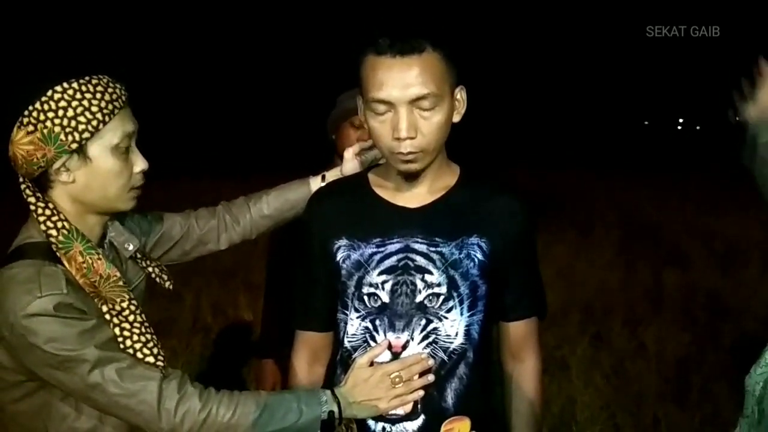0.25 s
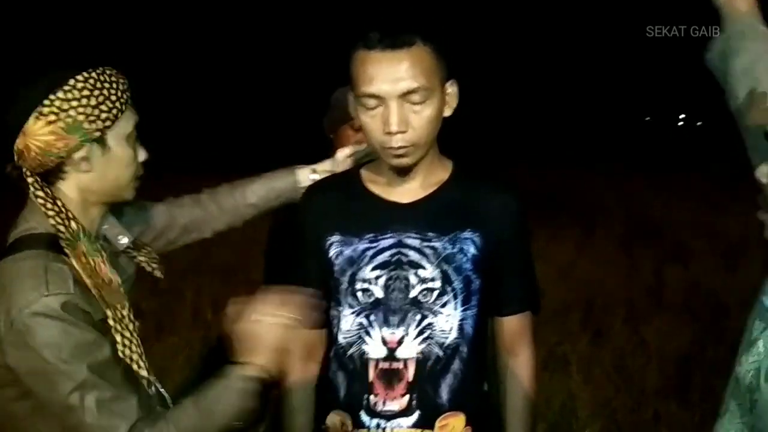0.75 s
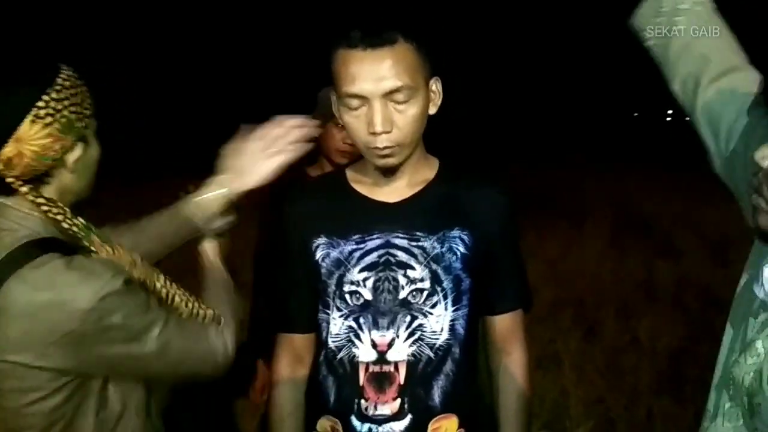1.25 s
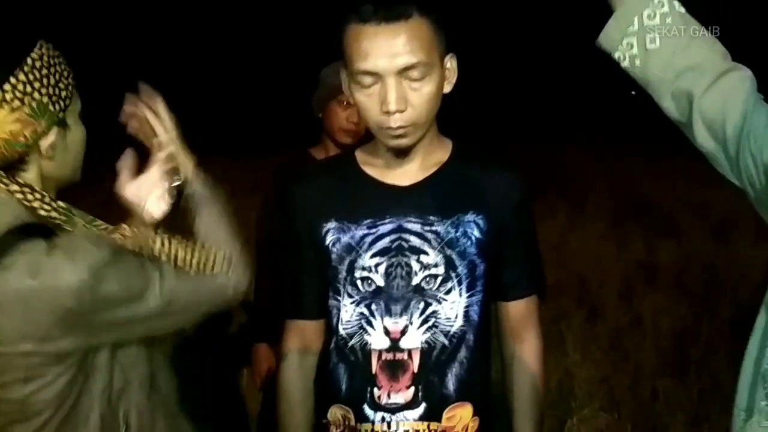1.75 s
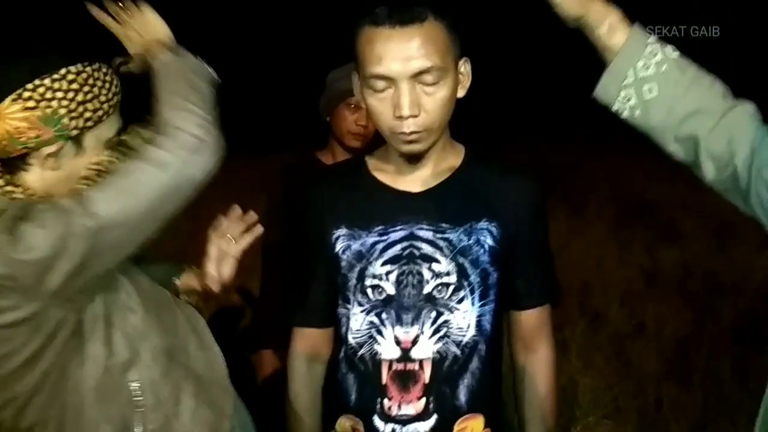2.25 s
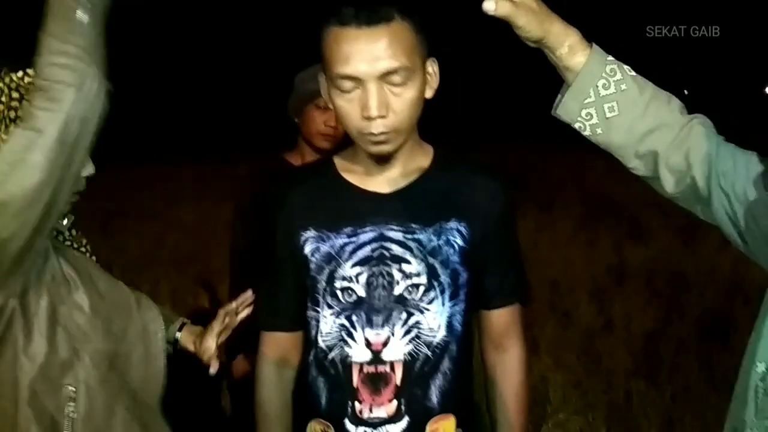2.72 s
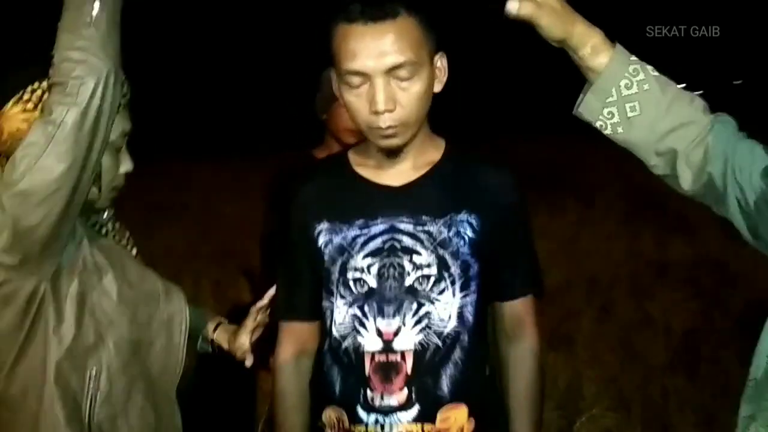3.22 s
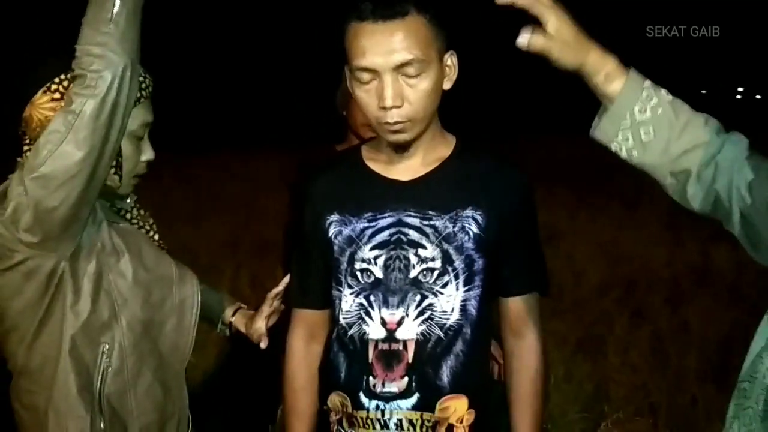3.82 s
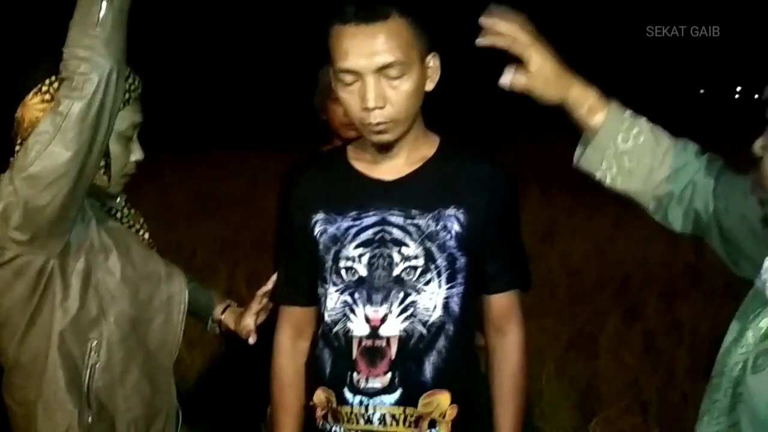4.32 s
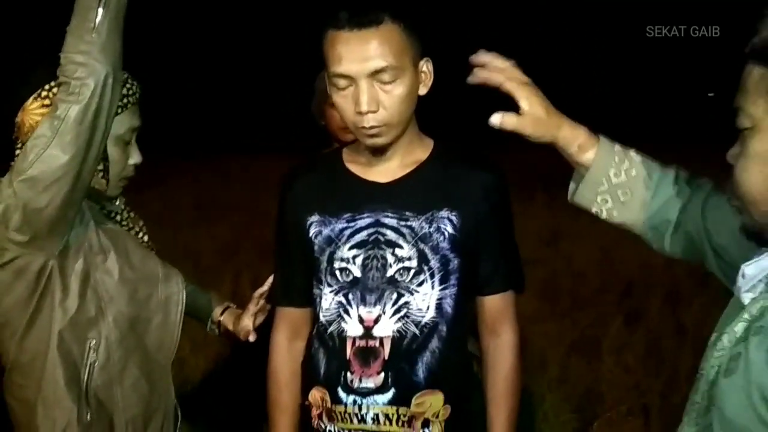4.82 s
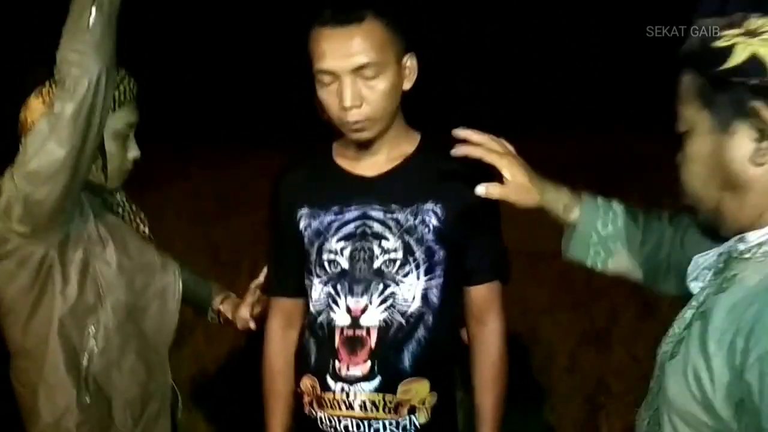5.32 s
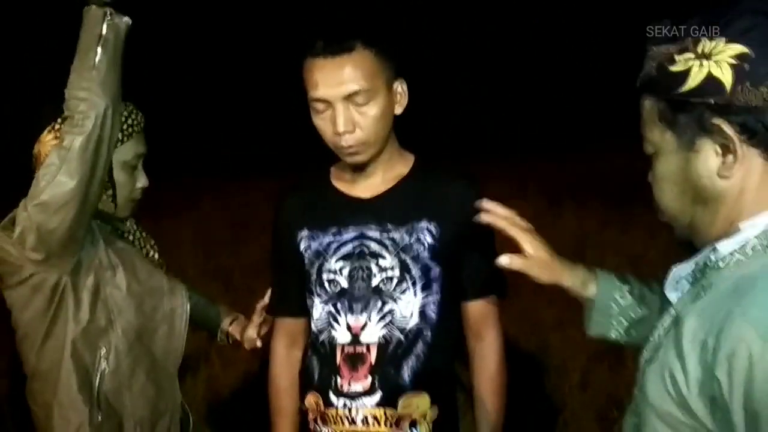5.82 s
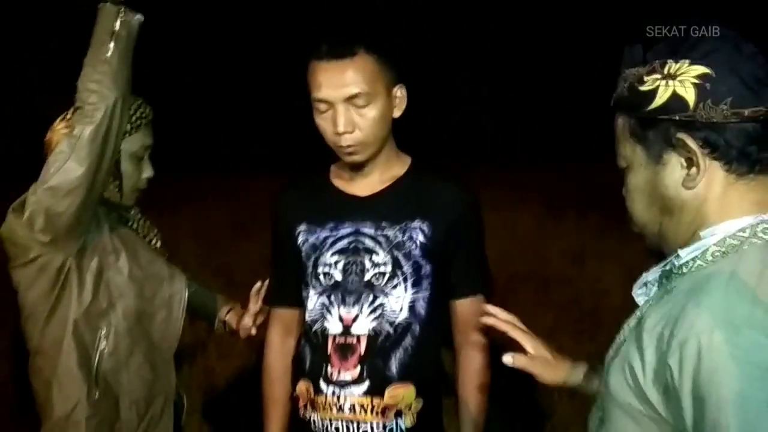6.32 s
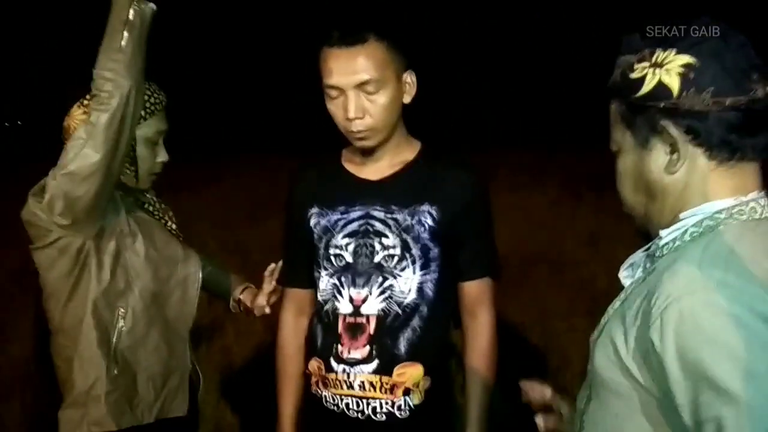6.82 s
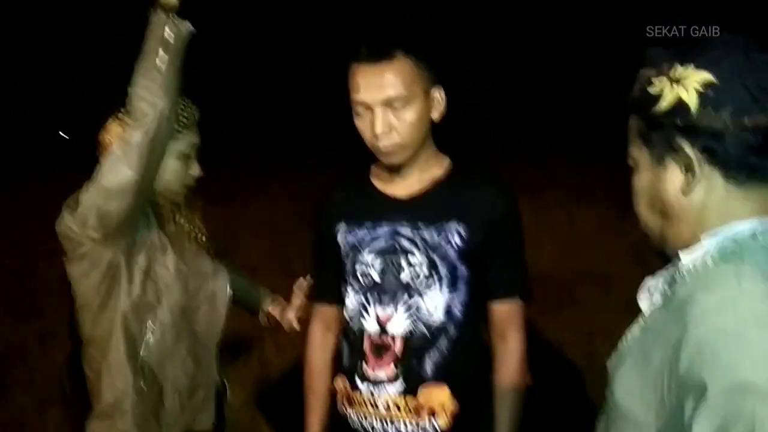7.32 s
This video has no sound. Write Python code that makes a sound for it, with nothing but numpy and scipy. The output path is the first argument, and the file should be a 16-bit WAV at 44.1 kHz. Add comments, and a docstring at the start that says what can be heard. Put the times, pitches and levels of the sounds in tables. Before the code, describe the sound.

A dark open field at night, heard in stereo without room echo. From 0 s to 7.5 s a near katydid left of centre rasps about four times a second: a double wing tick, then usually three grainy strokes within a tenth of a second, brightest near 8 kHz. Behind it lie a shimmering hiss of far insects, stronger on the right, faint throbbing crickets, a steady very high buzz on the right and low distant traffic. Clothes rustle nearby from about 0.7 s; a sleeve swishes or foot scuffs at 1.4 and 1.9 s. A grip creaks in a short run of dull knocks at 1.9 s and briefly higher at 2.5 s. A far engine drone swells around 2.8 s and recedes. At 3.6 s a second, softer katydid joins near the centre, strengthening until 5.4 s. Cloth rustles again at 5.2 and 5.8 s; low crickets rise near the end, with a tiny scuff at 7.46 s.

```python
"""Night in an open field, over distant traffic, far crickets and a steady high buzz on the right.
From the start a near katydid on the left rasps four chirps a second: a double wing tick, then two or three
strokes of the file. Someone close by rustles their clothes and scuffs a foot; at 1.9 and 2.5 s a grip creaks.
A far engine swells around 2.8 s, a second katydid joins at 3.6 s, and the low crickets rise near the end.
Strokes are noise gated by slips of the scraper; resonances and filtered noise make the rest."""
import sys
import numpy as np
from scipy import signal
from scipy.fft import rfft, irfft, next_fast_len
from scipy.io import wavfile
from scipy.ndimage import uniform_filter1d, map_coordinates

SR = 44100
rng = np.random.default_rng(int(sys.argv[2]) if len(sys.argv) > 2 else 0)


def master_out(mix):
    """Clip the mix to full scale and print it as 16-bit PCM to the path in sys.argv[1]."""
    frames = np.transpose(np.atleast_2d(mix))
    ceiling = np.clip(frames, -1, 1)
    pcm = np.round(ceiling * 32767).astype(np.int16)
    wavfile.write(sys.argv[1], SR, pcm)


N = 332955
T = np.arange(N) / SR  # time in s

# distant traffic, spectrum: freq_hz, relative_db
RUMBLE_SPECTRUM = [(20, -21), (35, -18), (50, -5), (70, -7.5), (105, -3.5), (135, 2), (185, 0), (240, -7.5),
                   (330, -14), (500, -22.5), (800, -27.5), (1300, -55.5), (2000, -82), (4000, -80),
                   (10000, -39)]
# side against mid in the rumble and cloth noise: freq_hz, side_db
STEREO_WIDTH = [(60, -12), (130, -14.5), (260, -9.5), (500, -5.5), (1000, 1)]
# a far engine draws near and recedes: time_s, relative_db
ENGINE_PASS = [(0, -42), (1.5, -42.5), (2.8, -38.5), (4.6, -40), (6, -42), (7.55, -48)]
# song of tyres on the road: time_s, level_db
TYRE_SONG = [(0.6, -63), (1.2, -57), (2, -60), (4.1, -56.5), (4.8, -66)]

# far cricket choruses: centre_hz, width_hz, pulse_rate_hz, relative_db, swell_share (0 to 1)
CRICKET_CHORUSES = [(2413, 460, 18, -56, 0.7), (4702, 864, 27, -50.5, 0.1), (5954, 690, 15, -50, 0.07)]
# swelling shared by the choruses, mostly heard in the lowest: time_s, swell_db
CHORUS_SWELL = [(0, -2), (1.7, 2.5), (4, 1), (5.5, 1.5), (6.5, 2.5), (7.5, 7.5)]
# blended hiss of far katydids, left spectrum: freq_hz, relative_db
HISS_LEFT_SPECTRUM = [(3800, -42), (5400, -49), (6400, 12), (7300, 16), (8100, 8), (8900, 2), (9700, 21),
                      (10700, -5), (13500, 15), (14100, -5), (15500, -28)]
# blended hiss of far katydids, right spectrum: freq_hz, relative_db
HISS_RIGHT_SPECTRUM = [(3800, -67), (5400, -51), (6400, 0.5), (7200, 4), (8100, 10.5), (8800, -0.5),
                       (9700, 8.5), (11300, 6.5), (13500, 1), (14100, -12), (15500, -6)]

# moving clothes: time_s, relative_db
CLOTH_MOVES = [(0.06, -77), (0.63, -68), (0.73, -53), (1.03, -59.5), (1.2, -54), (1.92, -46.5),
               (2.17, -50.5), (3.39, -51), (5.05, -64), (5.24, -49), (5.38, -66), (5.58, -57),
               (5.77, -48.5), (5.97, -52.5), (6.45, -60.5), (7.4, -63)]
# colour of the cloth noise: freq_hz, relative_db
CLOTH_SPECTRUM = [(150, 4), (350, 7.5), (700, 12.5), (1000, 8.5), (1250, 8.5), (1550, 9), (1950, -6),
                  (3200, -5), (4000, -18), (5000, -30), (9000, 10), (15000, 1)]
# a sleeve's swish and foot scuffs: start_s, length_s, centre_hz, width_hz, level_db
SCUFF_EVENTS = [(0.22, 0.12, 600, 500, -53), (1.42, 0.36, 930, 1460, -46), (1.872, 0.12, 404, 402, -42),
                (7.46, 0.023, 890, 400, -48)]
# creaks of a grip: start_s, slip_count, ring_hz, slip_level_db
CREAK_EVENTS = [(1.890, 10, 350, -29), (2.4928, 2, 570, -27.5)]
SLIP_PERIOD_S, SLIP_SCATTER_DB = .006, 1.5

# resonances of the second katydid's wings: centre_hz, width_hz, relative_db
ANSWER_WING_MODES = [(7290, 84, -0.5), (8330, 180, -7.5), (9650, 430, -7.5), (11970, 480, -10.5),
                     (14500, 970, -11.5)]
# the second katydid keeps its own even beat, and warms up to full strength
ANSWER_START_S, ANSWER_PERIOD_S, ANSWER_STROKE_S = 3.604, .2305, .025
ANSWER_DB, ANSWER_SOFT_DB, WARM_UP_S = -35, -5, 1.8

# near katydid's chirps; after two strokes the next comes sooner: tick_s, stroke_count, relative_db
NEAR_CHIRPS = [(0.0288, 3, -28.5), (0.2732, 3, -28.5), (0.5007, 3, -29), (0.7356, 3, -29),
               (0.9667, 3, -28.5), (1.2007, 3, -27.5), (1.4307, 3, -28), (1.6586, 3, -27.5),
               (1.8899, 3, -29), (2.1265, 3, -28), (2.3608, 3, -28.5), (2.5916, 3, -28.5),
               (2.8209, 3, -28.5), (3.0565, 3, -27), (3.2871, 3, -28.5), (3.5072, 3, -29.5),
               (3.7383, 3, -28), (3.9695, 3, -29), (4.1945, 3, -29.5), (4.4196, 3, -29), (4.6508, 3, -29),
               (4.8866, 2, -30.5), (5.0848, 2, -30.5), (5.2843, 3, -29.5), (5.5188, 3, -29),
               (5.754, 3, -29.5), (5.9793, 3, -28.5), (6.2071, 3, -29), (6.4394, 3, -28), (6.6752, 2, -28),
               (6.8815, 3, -28), (7.1102, 3, -27), (7.3416, 3, -28)]
# strokes of a chirp, the second the sharpest: delay_after_tick_s, attack_s, rasp_between_slips_db
CHIRP_STROKES = [(.0130, .006, -3), (.0372, .0035, -8), (.0615, .006, -5)]
# what the near katydid's wings radiate: freq_hz, relative_db
WING_SPECTRUM = [(1800, -45.5), (2450, -20), (2800, -33.5), (3150, -25.5), (3900, -32.5), (4700, -22.5),
                 (5350, -27), (5900, -18.5), (6700, -9), (7600, 0), (8150, 0.5), (8900, -7.5), (10200, -6),
                 (12000, -13.5), (14200, -10)]
# sharp resonances of its wings: centre_hz, width_hz, relative_db
NEAR_WING_MODES = [(7680, 35, 4.5), (7860, 38, -13.5), (7980, 48, -10)]
PEAK_HZ, PEAK_WIDTH_HZ = 7970, 800  # its main, broad wing resonance
# its slowly changing bearing: time_s, left_minus_right_db, main_resonance_db
NEAR_BEARING = [(0, 4.5, -2), (3, 4.5, -2), (5.1, 4.5, 3.5), (7.4, 4, -1)]
# how much later it reaches the right ear: time_s, delay_s
RIGHT_EAR_LAG = [(0, .000428), (3.2, .000423), (3.9, .000413), (4.9, .000412), (5.8, .000403),
                 (7.4, .000396)]
# colour of its sound on the right, the side facing away: freq_hz, relative_db
FAR_SIDE_SPECTRUM = [(5000, -1), (6000, 1), (6600, -1.5), (7700, -8), (8400, -3), (9200, 0), (12000, -1),
                     (13300, -7), (14300, -10)]

TOP_HZ = 15450  # top of the audible band


def undb(db):
    """Decibels to gain."""
    return 10 ** (np.asarray(db) / 20)


def unit(x):
    """Scale to rms 1."""
    return x / np.sqrt(np.mean(x ** 2))


def curve(points):
    """Join (time, value) points with straight lines over the whole scene."""
    return np.interp(T, *np.transpose(points))


def pan_gain(pan_db):
    """Left and right gains that differ by pan_db; positive leans left."""
    return undb(np.array([[pan_db], [-pan_db]]) / 2)


def filtered(x, response):
    """Filter by a response given as a function of frequency."""
    size = next_fast_len(N + 8192)
    hz = np.maximum(np.arange(size // 2 + 1) * SR / size, 1)
    return irfft(rfft(x, size) * response(hz), size)[..., :N]


def colour(x, points):
    """Filter by (Hz, dB) points joined on a log-frequency axis."""
    hz, db = np.transpose(points)
    return filtered(x, lambda f: undb(np.interp(np.log(f), np.log(hz), db)))


def resonate(x, modes):
    """Ring a sound through parallel resonances, each with its own centre, width and level."""
    return filtered(x, lambda f: sum(undb(db) / (1 + 2j * (f - hz) / width) for hz, width, db in modes))


def band_noise(hz, width, order):
    """Two unrelated channels of noise in one band, rms 1."""
    noise = rng.standard_normal((2, N))
    return unit(filtered(noise, lambda f: 1 / np.sqrt(1 + np.abs(2 * (f - hz) / width) ** (2 * order))))


def wide_noise(points):
    """Coloured mid and side noise, rms 1; the side is held down most in the bass."""
    mid, side = colour(rng.standard_normal((2, N)), points)
    return unit(mid + colour(side, STEREO_WIDTH) * np.array([[1], [-1]]))


def walk(rate):
    """Slow chance: random levels, rate a second, joined smoothly with a spread near 1."""
    hold = max(int(SR / rate), 1)
    levels = np.repeat(rng.standard_normal(N // hold + 1), hold)
    return 1.207 * uniform_filter1d(levels, hold)[:N]


def shimmer(x, depth_db, rate, size=256):
    """Let neighbouring bands swell and fade on their own, about rate times a second."""
    bands = signal.stft(x, nperseg=size)[2]
    hold = max(int(2 * SR / size / rate), 1)
    drift = uniform_filter1d(rng.standard_normal(bands.shape[-2:]), hold, axis=1)
    drift = unit(uniform_filter1d(drift, size=3, axis=0))
    return signal.istft(bands * undb(depth_db * drift), nperseg=size)[1][..., :N]


def add(track, s, piece):
    """Mix a piece into a track from time s on."""
    i = int(np.clip(s * SR, 0, N))
    track[..., i:i + piece.shape[-1]] += piece[..., :N - i]


def scatter(x, t60):
    """Grass and bodies scatter a sound into a short tail, unrelated left and right."""
    t = T[:SR // 5]
    tail = rng.standard_normal((2, len(t))) * undb(-60 * t / t60)
    return signal.fftconvolve(x[None], tail / np.sqrt(np.sum(tail ** 2) / 2), axes=1)[:, :N]


def blur(x, t60):
    """Leaves and grass smear each click into a short noise tail, different every time and at each ear."""
    fade = undb(-60 * T[:SR // 5] / t60) ** 2
    power = signal.fftconvolve(x ** 2, fade / fade.sum())[:N]
    return np.sqrt(np.maximum(power, 0)) * rng.standard_normal((2, N))


def traffic(rumble_db=-37.0, drone_hz=105, drone_db=-6, exhaust_db=-5, surge_db=0.3):
    """A steady rumble, and a far engine whose exhaust noise and wavering drone swell together."""
    rumble = wide_noise(RUMBLE_SPECTRUM) * undb(rumble_db)
    drone = np.sin(2 * np.pi * np.cumsum(drone_hz * (1 + .012 * walk(6))) / SR)
    exhaust = band_noise(96.7, 41, order=3)[0]
    engine = undb(drone_db) * drone + undb(exhaust_db) * exhaust
    return rumble + engine * undb(curve(ENGINE_PASS) + surge_db * walk(4.2))


def tyres(hz=1000, width_hz=130):
    """Tyres sing faintly on the distant road, a narrow band of noise."""
    return band_noise(hz, width_hz, order=2) * undb(curve(TYRE_SONG))


def far_insects(throb_db=1.5, swell_db=1, flicker_db=1.5, patchy_db=2.5, shimmer_db=3.0,
                left_db=-41, right_db=-36.0):
    """Cricket choruses throb at loose pulse rates; the farthest singers blend into a shimmering hiss."""
    choruses = 0
    for hz, width, rate, db, share in CRICKET_CHORUSES:
        phase = 2 * np.pi * np.cumsum(rate * (1 + 0.26 * walk(8.3))) / SR
        slow_db = share * curve(CHORUS_SWELL) + swell_db * walk(4.02)
        singers = shimmer(band_noise(hz, width, order=10), patchy_db, rate=25)
        choruses = choruses + singers * undb(db + slow_db + throb_db * np.sin(phase))
    hiss = []
    for db, points in [(left_db, HISS_LEFT_SPECTRUM), (right_db, HISS_RIGHT_SPECTRUM)]:
        noise = shimmer(rng.standard_normal(N), shimmer_db, rate=20)
        hiss.append(undb(db + flicker_db * walk(60)) * unit(colour(noise, points)))
    return choruses + np.array(hiss)


def buzzer(level_db=-46, pan_db=-3, beat_hz=220.2):
    """A distant bush cricket on the right buzzes without pause, one click per wing beat, high in the treble."""
    beats = np.floor(np.cumsum(beat_hz * (1 + .0013 * walk(25))) / SR)
    clicks = np.diff(beats, prepend=0)
    song = colour(clicks, [(8000, -30), (11200, -4), (12900, 0), (13700, -1), (14500, -12)])
    return undb(level_db) * pan_gain(pan_db) * unit(scatter(song, t60=0.055))


def person(cloth_db=7.0, crinkle_db=2.25):
    """Clothes rustle with the arms, a sleeve swishes and feet scuff the soil: shaped bursts of noise."""
    out = wide_noise(CLOTH_SPECTRUM) * undb(curve(CLOTH_MOVES) + cloth_db + crinkle_db * walk(45))
    for s, length, hz, width, db in SCUFF_EVENTS:
        push = np.hanning(int(length * SR))
        mid, side = band_noise(hz, width, order=2)[:, :len(push)]
        add(out, s, undb(db) * push * unit(mid + 0.49 * side * np.array([[1], [-1]])))
    return out


def creaks(width_hz=650):
    """Something held tight sticks and slips, each slip a dull knock; a harder grip rings higher."""
    out = 0
    for s, count, hz, db in CREAK_EVENTS:
        slips = np.zeros(N)
        for k in range(round(count)):
            add(slips, s + k * SLIP_PERIOD_S, undb(db + SLIP_SCATTER_DB * rng.standard_normal(1)))

        def body(f):
            """One damped resonance, dulled above twice its pitch."""
            return 1 / (1 + 1j * (f - hz ** 2 / f) / width_hz) / np.sqrt(1 + (f / (2 * hz)) ** 10)

        knock_peak = filtered(signal.unit_impulse(N), body).max()
        out = out - filtered(slips, body) / knock_peak
    return out


def wing_stroke(slip_s, attack_s, jitter, fade_s, rasp_db, uneven_db, count):
    """The scraper jumps along the file in weakening slips, rasping over the teeth between them; rms 1."""
    t = T[:int(.027 * SR)]
    force = np.minimum(t / attack_s, 1) * np.exp(-(t / fade_s) ** 2)
    timing, strength = rng.standard_normal((count, 2)).T
    slip_times = slip_s * np.cumsum(np.exp(jitter * timing))
    # each slip is a burst of tooth strikes under a millisecond long
    bursts = np.exp(-((t - slip_times[:, None]) / .0005) ** 2)
    slips = undb(uneven_db * strength) @ bursts
    teeth = rng.choice([-1, 1], len(t))
    return unit(force * (slips + undb(rasp_db)) * teeth)


def second_katydid(gain_db=-3, pan_db=1, grass_db=-4, grass_t60=0.18, vary_db=2.0):
    """Three short strokes a chirp on more sharply tuned wings, further off."""
    drive = np.zeros(N)
    for s in np.arange(ANSWER_START_S, N / SR, ANSWER_PERIOD_S):
        db = ANSWER_DB + ANSWER_SOFT_DB * max(1 - (s - ANSWER_START_S) / WARM_UP_S, 0)
        for k in range(3):
            stroke = wing_stroke(slip_s=.002, attack_s=.0055, jitter=.25, fade_s=.013,
                                 rasp_db=-2, uneven_db=2, count=7)
            add(drive, s + k * ANSWER_STROKE_S, undb(db + rng.standard_normal()) * stroke)
    heard = shimmer(drive + undb(grass_db) * blur(drive, t60=grass_t60), vary_db, rate=14)
    song = resonate(heard, ANSWER_WING_MODES)
    song = colour(song, [(3500, -40), (6800, 0), (13000, 0), (15500, -6)])
    return unit(song) * np.std(drive) * undb(gain_db) * pan_gain(pan_db)


def wing_tick(second_db=-7, hz=8000, ring_db=-2):
    """The wings open with a ringing, grainy snap and a weaker one 8 ms later."""
    t = T[:int(.012 * SR)]

    def snap(s):
        """A brief swell around time s."""
        return np.exp(-((t - s) / .0007) ** 2)

    grain = unit(rng.choice([-1, 1], len(t)) + undb(ring_db) * np.sin(2 * np.pi * hz * t))
    return (snap(.0005) + undb(second_db) * snap(.0088)) * grain


def flex(stroke, hz=7800, drift_hz=330, width_hz=700, ring_db=-7, vary_db=5.0):
    """The wing bends anew for each stroke, so its bright core shifts in pitch and strength."""
    detune, strength = np.clip(rng.standard_normal(2), -1.5, 1.5)
    b, a = signal.iirpeak(hz + drift_hz * detune, hz / width_hz, fs=SR)
    core = signal.lfilter(b, a, stroke)
    return stroke + undb(ring_db + vary_db * strength) * core


def near_chirps(tick_db, tick_scatter_db):
    """The bare wing motion: ticks as the wings open, then closing strokes that each ring differently."""
    drive = np.zeros(N)
    for s, strokes, db in NEAR_CHIRPS:
        snap_db = db + tick_db + tick_scatter_db * rng.standard_normal()
        add(drive, s - .0005, undb(snap_db) * wing_tick())  # the snap peaks at s
        for delay, attack, rasp in CHIRP_STROKES[:round(strokes)]:
            stroke = wing_stroke(slip_s=.0028, attack_s=attack, jitter=.16, fade_s=.021,
                                 rasp_db=rasp, uneven_db=1.7, count=9)
            add(drive, s + delay, undb(db) * flex(stroke))
    return drive


def near_katydid(gain_db=2.03, tick_db=4.5, tick_scatter_db=0.6, leaves_db=-5, grass_db=-5,
                 field_db=-10, field_t60=0.28, vary_db=1.65):
    """Chirps reach the left ear first, smear in leaves, grass and field, and ring with the wings."""
    drive = near_chirps(tick_db, tick_scatter_db)
    late = map_coordinates(drive, [(T - curve(RIGHT_EAR_LAG)) * SR], order=5)
    heard = np.array([drive, late])
    heard = heard + undb(leaves_db) * blur(drive, t60=.012)
    heard = heard + undb(grass_db) * scatter(drive, t60=.06)
    heard = heard + undb(field_db) * blur(drive, t60=field_t60)
    heard = shimmer(heard, vary_db, rate=30)
    # the part below 6 kHz is slightly softer and flutters at random
    low = filtered(heard, lambda f: 1 / (1 + (f / 6000) ** 24))
    heard = heard - low + undb(-2) * shimmer(low, 4, rate=45)
    times, pan_points, peak_points = np.transpose(NEAR_BEARING)
    pan = undb(np.interp(T, times, pan_points) / 2)
    peak_gain = undb(np.interp(T, times, peak_points))
    peak = filtered(heard, lambda f: np.exp(-(2 * (f - PEAK_HZ) / PEAK_WIDTH_HZ) ** 2))
    ring = resonate(heard, NEAR_WING_MODES)
    left, right = colour(heard + (peak_gain - 1) * peak + ring, WING_SPECTRUM)
    right = colour(right, FAR_SIDE_SPECTRUM)
    return undb(gain_db) * np.std(drive) * np.array([unit(left) * pan, unit(right) / pan])


def scene():
    """All sources in stereo, from the background to the near katydid."""
    background = traffic() + tyres() + far_insects() + buzzer()
    close_by = person() + creaks()
    return background + close_by + second_katydid() + near_katydid()


def record(dry):
    """A steep low-pass removes the extreme treble."""
    top_cut = signal.ellip(10, .2, 70, TOP_HZ, fs=SR, output="sos")
    return signal.sosfilt(top_cut, dry)


dry = scene()
out = record(dry)
master_out(out)
```